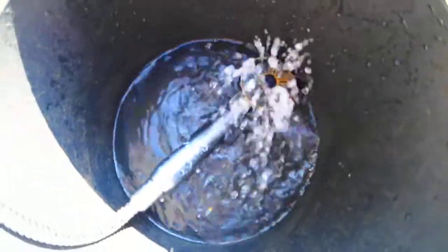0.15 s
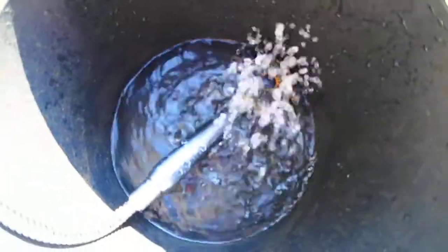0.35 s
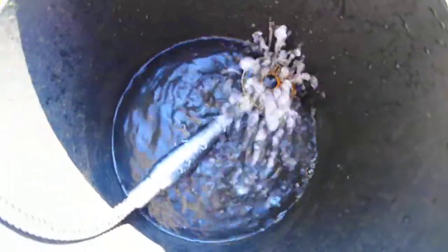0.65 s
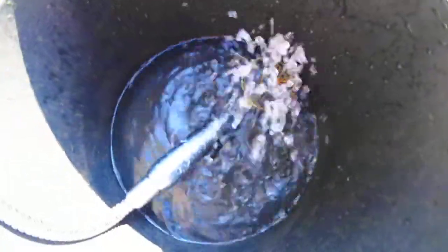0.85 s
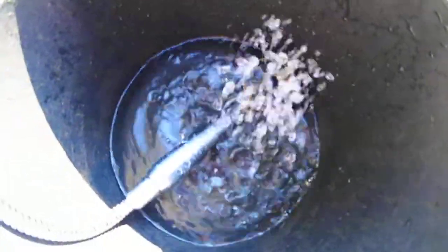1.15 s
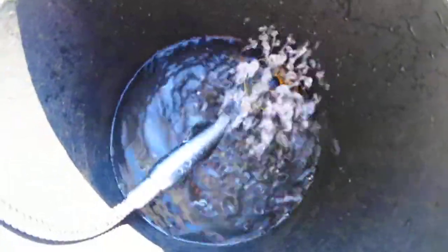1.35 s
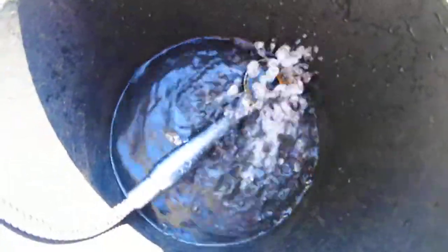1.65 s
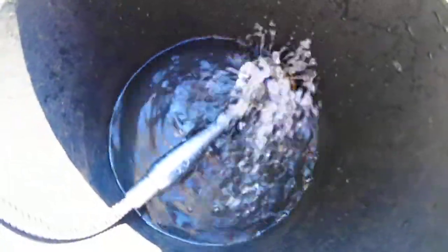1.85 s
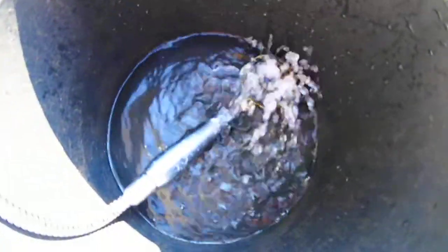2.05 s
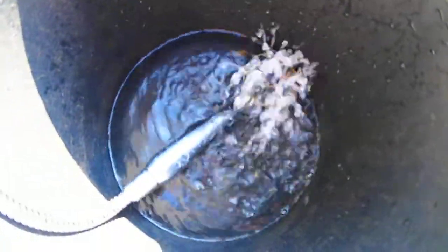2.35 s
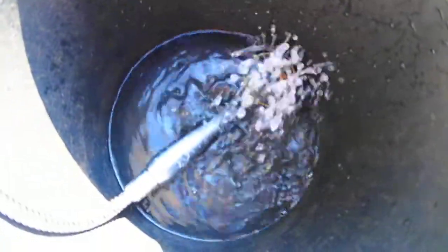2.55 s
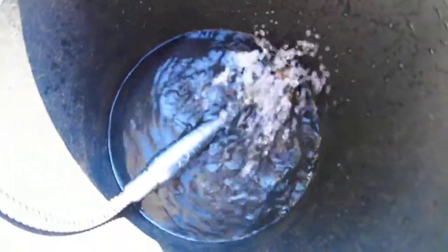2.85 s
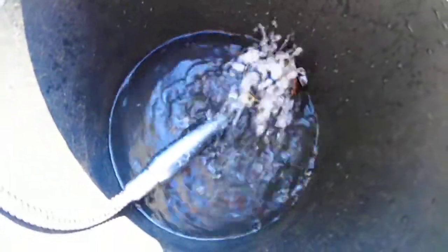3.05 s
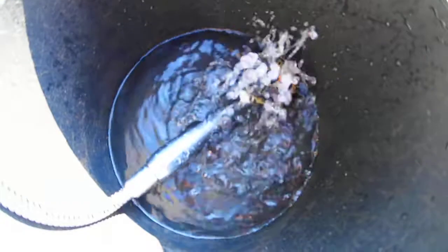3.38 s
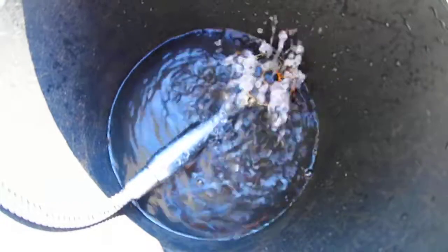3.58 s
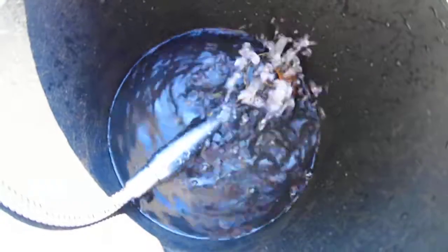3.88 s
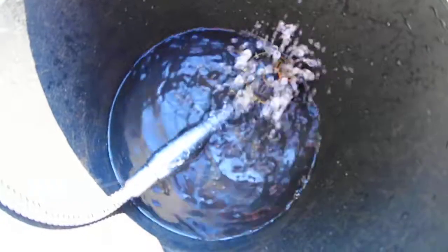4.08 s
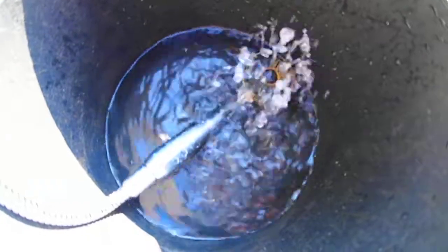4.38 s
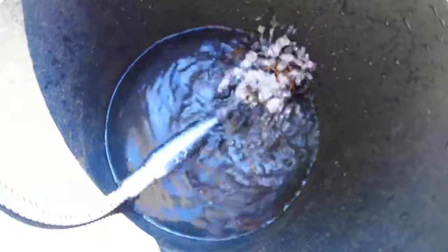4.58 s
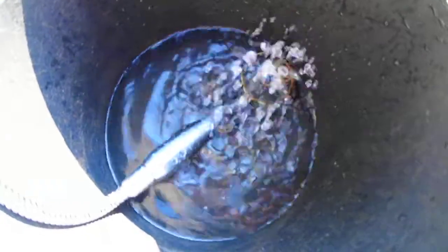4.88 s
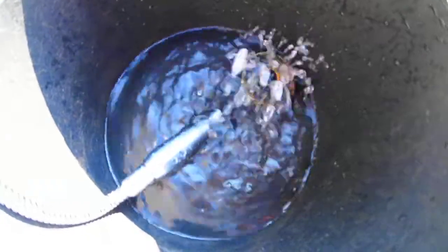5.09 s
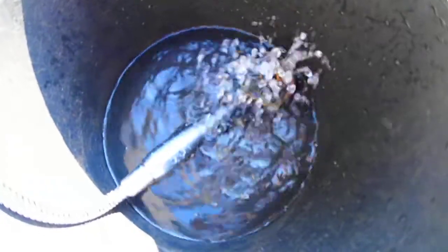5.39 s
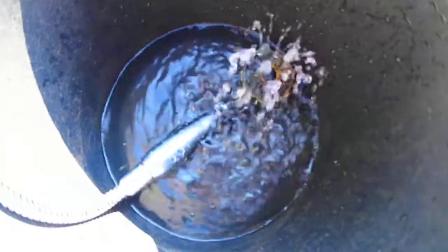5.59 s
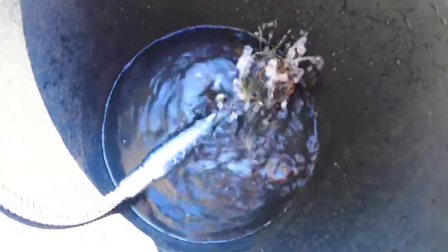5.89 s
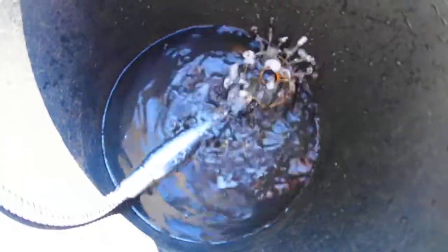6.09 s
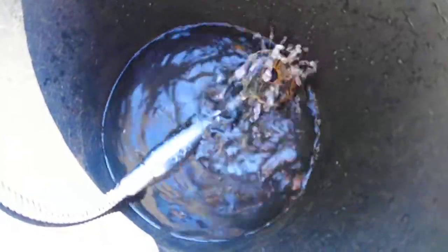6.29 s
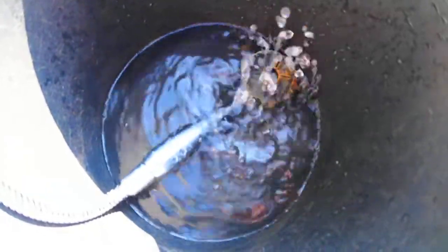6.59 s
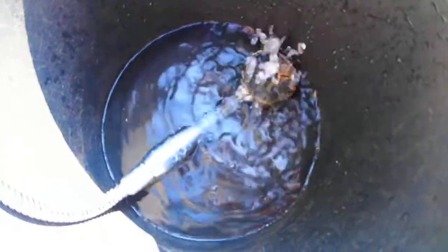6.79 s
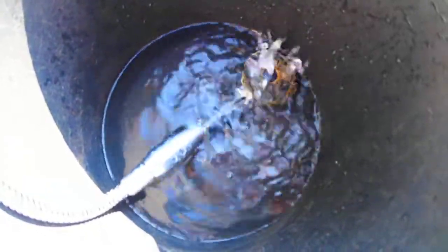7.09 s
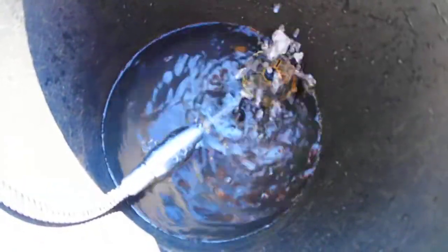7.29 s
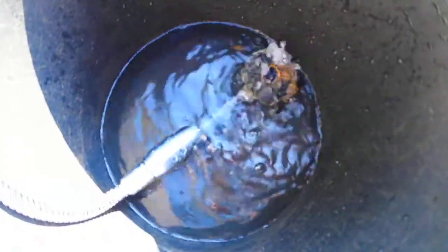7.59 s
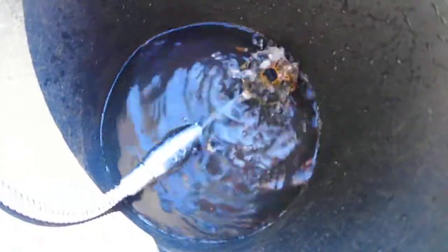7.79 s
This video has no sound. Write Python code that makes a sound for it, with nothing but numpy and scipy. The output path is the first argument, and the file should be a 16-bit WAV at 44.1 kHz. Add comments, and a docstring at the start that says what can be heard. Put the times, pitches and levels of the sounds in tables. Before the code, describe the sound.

A submerged hand shower head spurts water up through a shallow bucket. Crowded drops tick and plink immediately, their tiny bubbles ringing upward in pitch over fizzing spray, soft churning and a faint low drone. Heavy blobs splat now and then. The splashing is busiest early and gets sparser toward the end. Close stereo microphone, short bucket echoes.

```python
"""Fine spray fizzes from the start over soft churning and a low drone, and drops at once tick and ring.
The place is a bucket: a hand shower head lies in it and jets up through shallow water, heard close, in stereo.
Each falling drop ticks on the surface and traps an air bubble that rings and rises in pitch.
Small bubbles chirp between them, heavy blobs splat or knock, a faint whistle comes and goes,
and the bucket wall throws back close echoes."""
import sys
import numpy as np
from scipy import signal
from scipy.fft import rfft, irfft
from scipy.io import wavfile

SR = 44100
rng = np.random.default_rng(int(sys.argv[2]) if len(sys.argv) > 2 else 0)


def output_pcm(signal):
    """Save a mono or channel-first signal as 16-bit PCM at the path in sys.argv[1].

    Samples are clipped to [-1, 1] before scaling.
    """
    pcm = np.clip(np.atleast_2d(signal).T, -1, 1) * 32767
    wavfile.write(sys.argv[1], SR, np.round(pcm).astype(np.int16))


N = 350154

# strength of the fountain, the base level of the spray and small bubbles: start_s [s], level_db [dB]
FOUNTAIN_STRENGTH = [(0.0, -44.5), (3.69, -46), (3.98, -40), (4.16, -46), (4.64, -45.5), (4.75, -45.5),
                     (5.35, -49), (5.7, -52), (6.43, -48.5), (7.03, -52.5), (7.23, -46), (7.94, -51)]
# colour given to the fine spray and the lesser drops, with a deep dip near 10.8 kHz: pitch_hz [Hz], level_db
# [dB, relative]
SPRAY_COLOUR = [(1300, -56), (2400, -4.5), (4500, 4), (6000, 1), (9000, 6), (10800, -25), (13000, -4),
                (16000, -3.5)]
# colour of churning water and flow in the hose: pitch_hz [Hz], level_db [dB per Hz, relative]
CHURN_COLOUR = [(30, -17), (80, -1.5), (380, 0), (700, -5.5), (1000, -2.5), (2500, -6.5), (12000, -24.5)]
# low drone of the jets under water: start_s [s], pitch_hz [Hz, band centre], level_db [dB rms]
DRONE_PATH = [(0, 326.4, -66), (2.499, 326.8, -60.5), (4, 287.7, -59), (7.94, 327.4, -71.5)]
# loudest drops, each trapping a bubble: start_s [s], level_db [dB, ring before its brevity gain],
# pitch_hz [Hz, before the climb], tick_db [dB, impact], pan_db [dB, left over right]
BIG_DROPS = [(0.0041, -9, 7460, -18.5, -7.5), (0.0221, -4.5, 1932, -4.5, 3), (0.0637, -3.5, 6070, -16, 0),
             (0.1007, -16.5, 2040, -13, 1), (0.1353, -25.5, 1600, -33, 1), (0.2109, -6, 2695, -9, 0),
             (0.2556, -13, 3100, -41, -4), (0.342, -28.5, 1260, -17.5, -8), (0.3683, -20, 2400, -22, -14),
             (0.3868, -6.5, 3060, -4, 9), (0.4862, -9, 4080, -13.5, -1), (0.4928, -8.5, 7500, -18, 1),
             (0.5073, -5, 4400, -18, -1), (0.5642, -10, 3760, -20, 1), (0.6333, -6.5, 3080, -34, 1),
             (0.6827, -9.5, 1907, -9, 0), (0.8171, -5.5, 3070, -15, 5), (0.871, -9, 3350, -43, -12.5),
             (0.9507, -7, 5750, -11, -2), (1.0242, -4, 4210, -2, -1), (1.084, -8, 4610, -19, 0),
             (1.213, -0.5, 6570, -13.5, 6), (1.249, -26, 1490, -13, -6), (1.268, -6.5, 2750, -16, 6),
             (1.3244, -12.5, 3030, -11.5, 0), (1.359, -18.5, 1607, -21, 1), (1.3643, 1, 3605, -11.5, -2),
             (1.4157, 2.5, 5520, -23, -5), (1.45, -2.5, 3070, -37, -8), (1.4625, -4.5, 2670, -32, 0),
             (1.473, -32.5, 1266, -42, 4), (1.543, -1.5, 3000, -12.5, -1), (1.586, -13, 4310, -23, 0),
             (1.5868, -9, 2110, -4.5, 0), (1.6706, -3, 3265, -11, 1), (1.7626, -2.5, 4530, -19, 0),
             (1.799, -4, 5150, -36, -1), (1.8054, -10, 2670, -28, -5), (1.8704, -8.5, 2270, -7, -3),
             (1.9043, -5, 4460, -10, 2), (1.9038, -12.5, 2450, -12, -11), (1.9277, -12.5, 1606, -42, -2),
             (1.94, -5, 4220, -9, 0), (2.006, -12, 4200, -15, -1), (2.0253, -5, 4090, -10.5, -1),
             (2.073, -2.5, 5570, -19, 0), (2.0991, -9, 1465, -5, -1), (2.1074, -24, 1526, -28, 12),
             (2.169, -14.5, 3000, -9.5, 3), (2.1867, -19.5, 1540, -13, 1), (2.2544, -9.5, 2420, -9.5, -8),
             (2.256, -13.5, 1740, -18, 4), (2.3367, -15.5, 1765, -7, -9), (2.405, -14, 4180, -9, -6),
             (2.444, -16.5, 2720, -9.5, 3), (2.4868, -4.5, 6800, -17, -4), (2.5118, -18, 764, -10.5, 0),
             (2.544, -30, 1008, -41, 8), (2.571, -31, 924, -46, 0), (2.6228, -7.5, 2890, -14, 0),
             (2.6502, -17.5, 1550, -13, 1), (2.7001, -13, 3590, -3, -2), (2.7394, -5.5, 3210, -4.5, -1),
             (2.8066, -8.5, 2830, -25, 2), (2.8492, -10.5, 5540, -27, 0), (2.8537, -3.5, 7830, -24, 0),
             (2.876, -32, 1450, -43, -9), (2.9021, -12.5, 3940, -9.5, -1), (2.9089, -12, 3020, -11, 5),
             (3.044, -9, 2050, -8, -1), (3.132, -5, 4620, -32, -1), (3.1421, -4.5, 5000, -8.5, -4),
             (3.157, -16, 2500, -39, -5), (3.185, -7, 3840, -31, -4), (3.1906, -7, 2790, -21, 8),
             (3.2132, -9.5, 5240, -16, 1), (3.2269, -9, 1073, -8, 0.5), (3.267, -9, 1533, -15.5, 0.5),
             (3.3168, -1, 4660, -36, -3), (3.344, -16.5, 3230, -10, -2), (3.385, -7, 1574, -11, -0.5),
             (3.4031, -9, 2300, -8, -12), (3.5027, -12.5, 2155, -6, -4), (3.5992, -12, 3450, -16, -9),
             (3.608, 0, 3257, -5.5, -1), (3.682, -9, 3950, -11, -3), (3.7746, -6.5, 5320, -6.5, -7),
             (3.7747, -5.5, 1658, -10.5, 1.5), (3.8312, -7.5, 4680, -16, 0), (3.843, -22, 1560, -17, 1),
             (3.8647, -10.5, 3340, -21, -5), (3.8732, -18.5, 1585, -13, 0), (3.9162, -13, 3040, -14, 2),
             (3.955, -14, 3160, -24, 5), (4.1213, -14.5, 2470, -15, -25), (4.1235, -9, 6400, -7, 4),
             (4.1629, -15, 2220, -13.5, -4), (4.196, -5, 5570, -11.5, -5), (4.1999, -11.5, 2270, -24, -11),
             (4.2997, -29, 1524, -29.5, 0), (4.352, -22, 1540, -21, -2), (4.371, -9, 5960, -21.5, -2),
             (4.465, -6.5, 3210, -35, -1), (4.4981, -4.5, 4100, -24, -2), (4.528, -7, 4600, -9.5, -1),
             (4.5849, -7, 2640, -15.5, -4.5), (4.6576, -3, 3030, -17, -3), (4.6603, -7.5, 1890, -21, 4),
             (4.7265, -10.5, 2840, -8, 2), (4.761, -6.5, 3250, -17, -4), (4.8189, -2.5, 3760, -10, -2),
             (5.0238, -4.5, 7320, -15.5, -2), (5.0986, -7, 2835, -10.5, 0), (5.1658, -1.5, 4440, -28, 0),
             (5.292, -12, 3950, -7.5, 6), (5.304, -13, 2780, -27, -3), (5.3198, -13, 2180, -5, -5),
             (5.4236, -9.5, 5360, -9, 1), (5.4492, -18, 1617, -19.5, 4), (5.5075, -6.5, 2353, -14.5, -9),
             (5.5363, -15.5, 2320, -19.5, -9), (5.5889, -8.5, 3410, -14, -3),
             (5.7718, -3.5, 3425, -12, -3.5), (5.9151, -5.5, 2474, -13, -8), (5.971, -12, 5400, -15.5, -7),
             (6.0005, -8.5, 5500, -19, 0), (6.075, -14, 2030, -11.5, -2), (6.159, -11.5, 3730, -25, -4),
             (6.2418, -9, 7760, -20, -6), (6.2653, -10.5, 1593, -9.5, 2), (6.2712, -8, 3380, -21, -3),
             (6.2802, -10.5, 2310, -27, -7), (6.3048, -11.5, 2020, -6, 0), (6.313, -12, 4200, -25, 0),
             (6.4507, 0.5, 5180, -16, -3), (6.4818, -17, 1620, -13.5, -2), (6.5103, -13, 2340, -19, -6),
             (6.6322, -10, 2190, -11, -5), (6.6635, -12, 2355, -17, -10), (6.7921, -12, 2453, -10, -11),
             (6.8961, -17, 1790, -18, 0), (7.1214, -14.5, 2066, -12, -10), (7.1402, -9, 3680, -18, 3),
             (7.2892, -20, 2300, -20, -11), (7.3797, -8.5, 3810, -15.5, 1), (7.4233, -7.5, 2475, -9.5, -8),
             (7.4848, -4, 3460, -20, -1), (7.5028, -7, 3060, -24, 5), (7.508, -12, 1720, -19, 1),
             (7.607, -2, 4480, -11.5, 1.5), (7.7442, -11.5, 4020, -14, -10),
             (7.8332, -8.5, 2625, -12.5, -5)]
# hard hits that jolt the whole bucket: start_s [s], level_db [dB, peak]
HARD_HITS = [(0.387, -46), (1.026, -24), (2.103, -30), (2.256, -35), (3.404, -33)]
# heavy blobs landing flat: start_s [s], level_db [dB, peak before the common splat gain]
HEAVY_BLOBS = [(0.973, -35), (2.425, -34.5), (2.978, -33.5), (4.118, -25.5), (4.669, -32.5), (5.144, -36),
               (5.498, -30.5), (5.591, -35.5), (5.681, -39), (5.76, -41.5), (6.158, -36), (7.195, -39.5)]
# hollow of the bucket under a splat: pitch_hz [Hz], level_db [dB, before the weight tilt], t60_s [s]
HOLLOW_MODES = [(355, -4.5, 0.048), (534, -12.5, 0.042), (990, -9, 0.046), (1145, 0, 0.021)]
# standing waves in the air across the bucket: pitch_hz [Hz], level_db [dB, relative to the direct sound]
AIR_MODES = [(1635, 2), (2310, -4), (4140, -2.5)]
# brief dips of the whole level: start_s [s], depth_db [dB, before recovery sets in]
LEVEL_DIPS = [(0.397, 0), (1.372, 19), (3.617, 3), (7.43, 7.5), (7.841, 3.5)]

CUTOFF_HZ = 16200   # no bubble climbs above this, and the final treble cut starts here
# big, low bubbles ring longer: t60 of a middling bubble, its pitch, and the power by which t60 falls with pitch
RING_T60_S, RING_HZ, RING_FALL = 0.02, 3000, 1
DROPLET_SPREAD_DB = 4.5   # mean excess of a droplet over the faintest, before the largest are capped


def from_db(db):
    """Decibels to gain."""
    return 10 ** (np.asarray(db) / 20)


def rms_one(x):
    """Scale to rms 1."""
    return x / np.sqrt(np.mean(x ** 2) + 1e-20)


def at_hz(points, hz):
    """Read a spectrum in dB on a log-frequency axis."""
    pitch_hz, level_db = np.transpose(points)
    return np.interp(np.log(hz), np.log(pitch_hz), level_db)


def band(x, low_hz, high_hz, order=2):
    """Causal band-pass."""
    edges_hz = [low_hz, min(high_hz, SR / 2 - 1000)]
    return signal.sosfilt(signal.butter(order, edges_hz, "band", fs=SR, output="sos"), x)


def drift(rate_hz):
    """Random wander: straight lines between unit-spread values drawn about rate_hz times a second."""
    count = int(rate_hz * N / SR) + 2
    return np.interp(np.linspace(0, count - 1, N), np.arange(count), rng.standard_normal(count))


def ring(clicks, hz, t60_s):
    """A damped resonance: a unit click sets a decaying sine of starting height 1 ringing."""
    radius = from_db(-60 / (t60_s * SR))
    angle = 2 * np.pi * hz / SR
    return signal.lfilter([0, np.sin(angle)], [1, -2 * radius * np.cos(angle), radius * radius], clicks + 1e-18)


def add(out, start_s, sound):
    """Mix a stereo sound in at its start time."""
    at = int(np.clip(start_s * SR, 0, N - 1))
    out[:, at:at + sound.shape[1]] += sound[:, :N - at]


def sides(pan_db):
    """Left and right gains of equal total power."""
    gains = from_db(np.array([[pan_db], [-pan_db]]) / 2)
    return rms_one(gains)


def wall_echoes(sound, echo=0.51, reach_s=0.0045, lag_s=0.00022, count=5):
    """Direct sound and close wall echoes (up to 1.5 m further); each path meets the two sides a little apart."""
    late = np.append(0, rng.uniform(.1, 1, count))   # 0 is the direct path
    strength = np.append(1, echo * rng.standard_normal(count)) * (1 - late / 2)
    arrival = ((late * reach_s + lag_s * rng.random((2, count + 1))) * SR).astype(int)
    heard = np.zeros((2, len(sound) + arrival.max()))
    for side, starts in zip(heard, arrival):
        for at, gain in zip(starts, strength):
            side[at:at + len(sound)] += gain * sound
    # each side keeps the energy of the dry sound
    return heard * np.sqrt(np.sum(sound ** 2) / np.sum(heard ** 2, axis=1, keepdims=True))


def froth(spray_db, froth_db=-26.0, froth_s=0.0043):
    """Level of all fine spray in dB: each big drop throws up some of its own, which settles quickly."""
    start_s, level_db = np.transpose(BIG_DROPS)[:2]
    landing = np.clip(start_s * SR, 0, N - 1).astype(int)
    thrown_power = np.bincount(landing, from_db(level_db + froth_db) ** 2, N)
    settling = signal.lfilter([1], [1, -np.exp(-1 / (froth_s * SR))], thrown_power + 1e-18)
    return 10 * np.log10(from_db(spray_db) ** 2 + settling)


def fizz(spray_db, level_db=0.5, per_s=3000, clump_db=4.5, cycles=24, count=20):
    """Fine spray: clumps of tiny droplets, each a brief ping that reaches the two sides with its own lag."""
    born = np.flatnonzero(rng.random(N) < per_s * from_db(clump_db * drift(60)) / SR)
    excess = np.minimum(rng.exponential(1, len(born)), 3.5)
    sizes = from_db(DROPLET_SPREAD_DB * excess) * rng.choice([-1, 1], len(born))
    pitch_index = rng.integers(0, count, len(born))
    lags = rng.integers(-4, 5, len(born))   # samples, right against left
    out = np.zeros((2, N))
    for k, hz in enumerate(np.geomspace(1400, 15500, count)):
        clicks, mine = np.zeros((2, N)), pitch_index == k
        clicks[0, born[mine]] = sizes[mine]
        clicks[1, (born[mine] + lags[mine]) % N] = sizes[mine]
        out += from_db(at_hz(SPRAY_COLOUR, hz)) * rms_one(ring(clicks, hz, cycles / hz))
    return from_db(spray_db + level_db) * rms_one(band(out, 3400, 22000))


def churn(level_db=-54.5, side_db=-5.5):
    """Soft rush of stirred water: coloured noise, mostly the same on both sides."""
    hz = np.maximum(np.arange(N // 2 + 1) * SR / N, 1)
    spectrum = rfft(rng.standard_normal((2, N))) * from_db(at_hz(CHURN_COLOUR, hz))
    mid, side = irfft(spectrum, N)
    return from_db(level_db) * rms_one(mid + from_db(side_db) * side * [[1], [-1]])


def drone(width_hz=31.5):
    """Rumble of the jets: low-passed noise carried up to a narrow band whose centre wanders in pitch."""
    start_s, pitch_hz, level_db = np.transpose(DRONE_PATH)
    t = np.arange(N) / SR
    lowpass = signal.butter(2, width_hz, fs=SR, output="sos")
    wander = signal.sosfilt(lowpass, rng.standard_normal((2, N)))
    phase = 2 * np.pi * np.cumsum(np.interp(t, start_s, pitch_hz)) / SR
    rumble = wander[0] * np.cos(phase) + wander[1] * np.sin(phase)
    return from_db(np.interp(t, start_s, level_db)) * rms_one(rumble)


def impacts(hz, crack_s=0.0012, crack_db=-3, top_hz=9800, ping_s=0.0024, scatter_s=0.0016,
            sizzle_db=-11, sizzle_spread_db=10.5, thud_db=-15, size=900, count=4):
    """One tick per drop: a noisy crack and a few tiny bubbles pinched off just after it, mostly higher in pitch."""
    t = np.arange(size) / SR
    white = rng.standard_normal((len(hz), size)) * np.exp(-t / crack_s)
    spread = 2 * rng.random((len(hz), 1)) - 1
    sizzle = from_db(sizzle_db + sizzle_spread_db * spread) * band(white, 11400, 13540)
    crack = from_db(crack_db) * band(white, 1994, 8100, order=3)
    thud = from_db(thud_db) * band(white, 750, 6800, order=1)
    ticks = crack + sizzle + thud
    lowest_hz = np.clip(hz, 2400, 4500)[:, None]
    for height, wait in rng.random((count, 2, len(hz), 1)):
        age_s = np.maximum(t + scatter_s * np.log(1 - wait), 0)   # silent until its random delay has passed
        ping_hz = lowest_hz * (top_hz / lowest_hz) ** height
        ping = np.sin(2 * np.pi * ping_hz * age_s) * np.exp(-age_s / ping_s)
        ticks += ping * (1 - wait / 2) / count
    return ticks / np.abs(ticks).max(axis=1, keepdims=True)


def ring_time(hz):
    """How long a bubble of this pitch rings (t60 in s), before a hard tick shortens it."""
    return RING_T60_S * (RING_HZ / hz) ** RING_FALL


def bubble(hz, t60_s, climb_octaves, swell_cycles=1.0, wobble_octaves=0.07, wobble_s=0.00362):
    """A trapped bubble rings up in a cycle or two, wobbles, and climbs ever faster as it nears the surface."""
    t = np.arange(int(1.3 * t60_s * SR) + 8) / SR
    shape = np.interp(t / wobble_s, np.arange(64), rng.standard_normal(64))
    age = t / t60_s
    climb = climb_octaves * age * (1 + age) / 2
    wobble = wobble_octaves * shape * np.sqrt(2 * age)
    pitch_hz = np.minimum(hz * 2 ** (climb + wobble), CUTOFF_HZ)
    swell = 1 - np.exp(-t * hz / swell_cycles)
    return np.sin(2 * np.pi * np.cumsum(pitch_hz) / SR) * swell * np.exp(-np.log(1000) * age)


def drops(rows, climb_octaves=0.32, climb_spread=0.62, tick_echo=0.32, damping=0.14, usual_tick_db=-4.0):
    """Each drop ticks and its bubble rings: louder but briefer after a hard tick, with a random climb."""
    out = np.zeros((2, N))
    climbs = climb_octaves * np.exp(climb_spread * (2 * rng.random(len(rows)) - 1))
    for row, tick, climb in zip(rows, impacts(rows[:, 2]), climbs):
        start_s, level_db, hz, tick_db, pan_db = row
        briefer = np.clip(from_db(damping * (tick_db - level_db - usual_tick_db)), .7, 2)
        note = from_db(level_db) * np.sqrt(briefer) * bubble(hz, ring_time(hz) / briefer, climb)
        add(out, start_s, sides(pan_db) * wall_echoes(note))
        add(out, start_s, sides(pan_db / 2) * from_db(tick_db) * wall_echoes(tick, echo=tick_echo))
    return out


def daughters(below_db=-11.0, tick_below_db=-23.0, wait_cycles=28, higher_octaves=0.695):
    """Rows for the smaller, higher bubble splitting off each big one; the bigger the parent, the longer the wait."""
    start_s, level_db, hz, tick_db, pan_db = np.transpose(BIG_DROPS)
    wait, height = rng.random((len(start_s), 2)).T
    child_s = start_s + wait_cycles / hz * (.5 + wait)
    child_hz = np.minimum(hz * 2 ** (higher_octaves * height), CUTOFF_HZ)
    return np.column_stack([child_s, level_db + below_db, child_hz, tick_db + tick_below_db, pan_db])


def lesser_drops(spray_db, level_db=21.5, spread_db=4.0, centre_hz=4700, octaves=0.536,
                 tick_db=-4.0, pan_db=5.0, count=620):
    """Rows for the small drops that fall at any time, all round the fountain."""
    when = rng.random(count) * N
    loud, width, pan = np.clip(rng.standard_normal((count, 3)), -2, 2).T
    hz = centre_hz * 2 ** (octaves * width)
    base_db = spray_db[when.astype(int)] + level_db + spread_db * loud
    ring_db = base_db + at_hz(SPRAY_COLOUR, hz)
    return np.column_stack([when / SR, ring_db, hz, base_db + tick_db, pan_db * pan])


def risers(spray_db, level_db=9.0, spread_db=9.0, start_hz=2900, spread_octaves=0.503,
           climb_octaves=0.49, length_s=0.0225, pan_db=1.0, count=60):
    """Bubbles drifting up to the surface chirp softly: no tick, a swell and a fade on an upward glide."""
    out = np.zeros((2, N))
    chances = 2 * rng.random((count, 4)) - 1
    for at, (loud, width, pan, slow) in zip(rng.integers(0, N, count), chances):
        age = np.linspace(0, 1, int(length_s * 2 ** (slow / 2) * SR))
        hz = start_hz * 2 ** (spread_octaves * width + climb_octaves * age * (1 + age) / 2)
        chirp = np.sin(2 * np.pi * np.cumsum(hz) / SR) * np.sin(np.pi * np.sqrt(age)) ** 2
        gain = from_db(spray_db[at] + level_db + spread_db * loud)
        add(out, at / SR, sides(pan_db * pan) * gain * wall_echoes(chirp))
    return out


def knocks(contact_s=0.0001, size=400):
    """A hard hit is one short push, alike on both sides and reaching down to the bass."""
    out, t = np.zeros((2, N)), np.arange(size) / SR
    push = band(np.exp(-t / contact_s), 25, 1200, order=1)
    for start_s, level_db in HARD_HITS:
        add(out, start_s, from_db(level_db) * push[None] / push.max())
    return out


def splats(level_db=5.0, slap_s=0.004, slap_db=-10.5, weight_tilt=0.44, size=4000):
    """A blob slaps the water for a few milliseconds and stirs the hollow of the bucket."""
    out, t = np.zeros((2, N)), np.arange(size) / SR
    for start_s, blob_db in HEAVY_BLOBS:
        slap = rng.standard_normal(size) * np.exp(-t / slap_s)
        # heavier blobs favour the lower modes
        weight_db = weight_tilt * (blob_db - np.mean(HEAVY_BLOBS, axis=0)[1])
        hollow = sum(from_db(mode_db - weight_db * np.log10(hz)) * ring(slap, hz, t60_s)
                     for hz, mode_db, t60_s in HOLLOW_MODES)
        body = rms_one(band(hollow, 410, 2800)) + from_db(slap_db) * rms_one(band(slap, 530, 1400))
        add(out, start_s, from_db(blob_db + level_db) * wall_echoes(body / np.abs(body).max()))
    return out


def whistle(hz=762, level_db=-64, octave_db=8.0, middle_s=4.29, length_s=0.55):
    """A faint, slightly unsteady whistle comes and goes, its octave stronger than its fundamental."""
    phase = 2 * np.pi * np.cumsum(hz * (1 + 0.0046 * drift(37))) / SR
    swell = np.exp(-((np.arange(N) / SR - middle_s) / length_s) ** 4)
    return from_db(level_db) * swell * (np.sin(phase) + from_db(octave_db) * np.sin(2 * phase))


def bucket(x, air_t60_s=0.028, tail_db=-18, tail_t60_s=0.036, build_s=0.0038, size=4000):
    """The air across the bucket rings at a few fixed notes, and scattered echoes die away fast."""
    t = np.arange(size) / SR
    fade = np.exp(-np.log(1000) * t / air_t60_s)
    tones = sum(from_db(level_db) * np.cos(2 * np.pi * hz * t) for hz, level_db in AIR_MODES)
    notes = tones * 2 * fade / fade.sum()
    tail = rng.standard_normal((2, size)) * np.exp(-np.log(1000) * t / tail_t60_s) * (1 - np.exp(-t / build_s))
    tail *= from_db(tail_db) / np.sqrt(np.sum(tail ** 2, axis=1, keepdims=True))
    return x + signal.oaconvolve(x, notes + tail, axes=1)[:, :N]


def dips(fall_s=0.006, recover_s=0.082):
    """Gain of the whole scene: the level dips within milliseconds and creeps back."""
    t = np.arange(N) / SR
    loss_db = np.zeros(N)
    for start_s, depth_db in LEVEL_DIPS:
        fall = np.clip((t - start_s) / fall_s, 0, 1)
        loss_db += depth_db * fall * np.exp(-np.maximum(t - start_s, 0) / recover_s)
    return from_db(-loss_db)


def scene():
    """All the water in the bucket; the churn, drone and whistle bypass its close echoes."""
    spray_db = np.interp(np.arange(N) / SR, *np.transpose(FOUNTAIN_STRENGTH))
    plinks = drops(np.vstack([BIG_DROPS, daughters(), lesser_drops(spray_db)]))
    # the plinks are kept out of the deep bass
    plinks = signal.sosfilt(signal.butter(1, 260, "high", fs=SR, output="sos"), plinks)
    water = bucket(fizz(froth(spray_db)) + plinks + risers(spray_db) + knocks() + splats())
    return dips() * (water + churn() + drone() + whistle())


def record(dry):
    """The microphone feed: peaks beyond full scale are clipped, then the top is cut steeply."""
    treble_cut = signal.ellip(10, .1, 70, CUTOFF_HZ, fs=SR, output="sos")
    return signal.sosfilt(treble_cut, np.clip(dry, -1, 1))


dry = scene()
out = record(dry)
output_pcm(out)
```